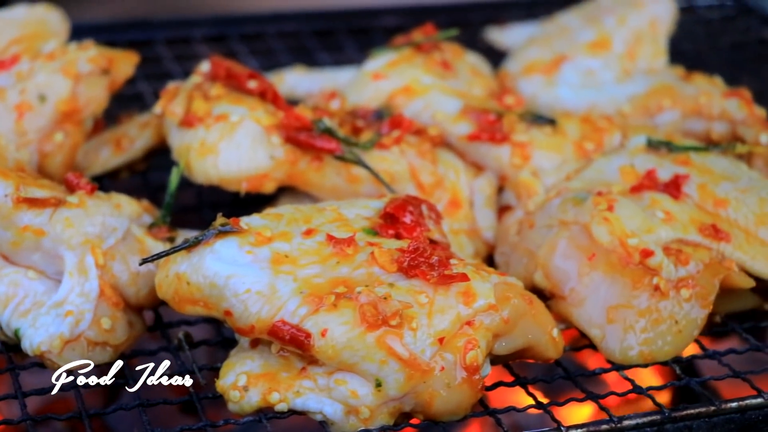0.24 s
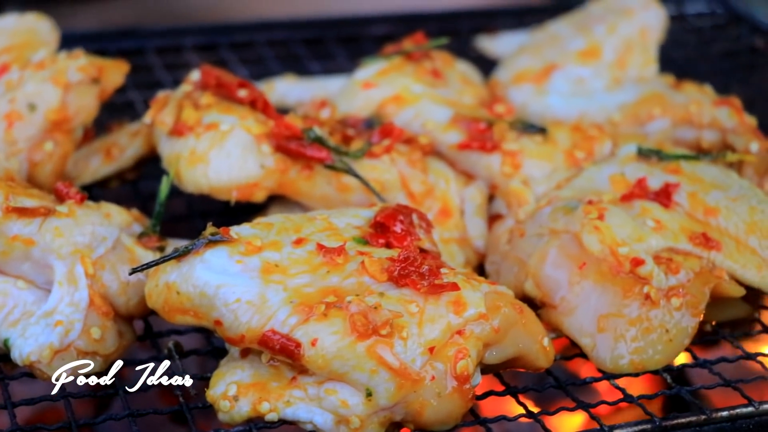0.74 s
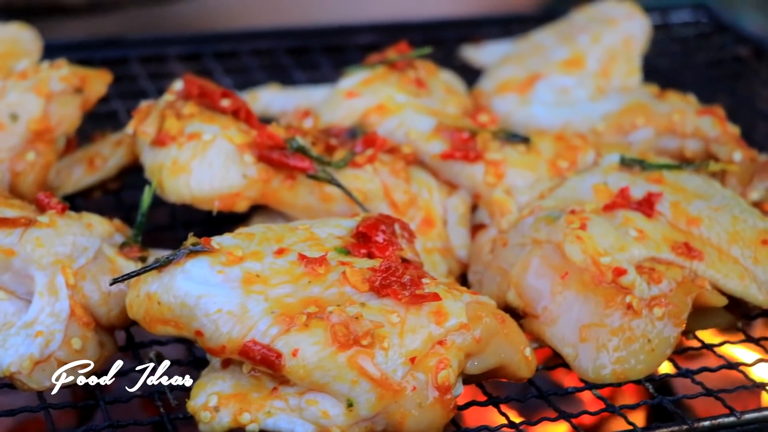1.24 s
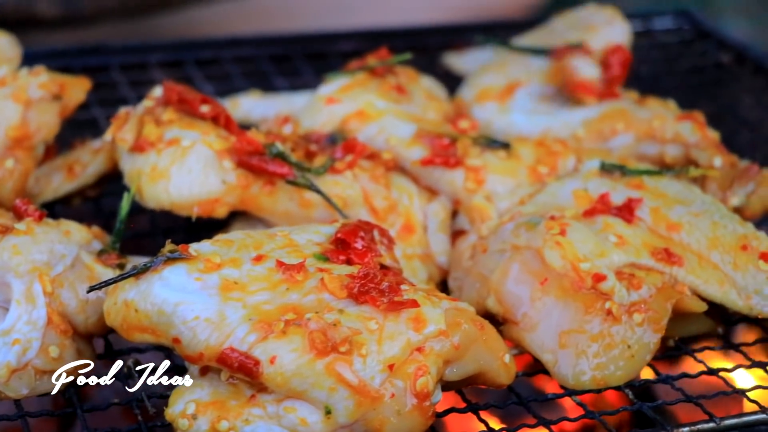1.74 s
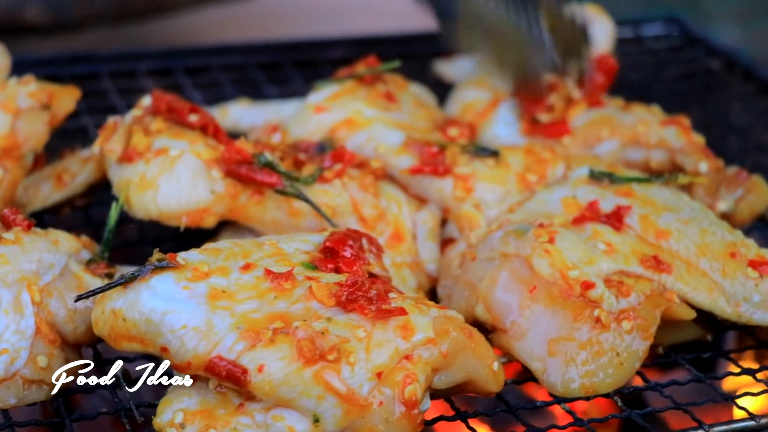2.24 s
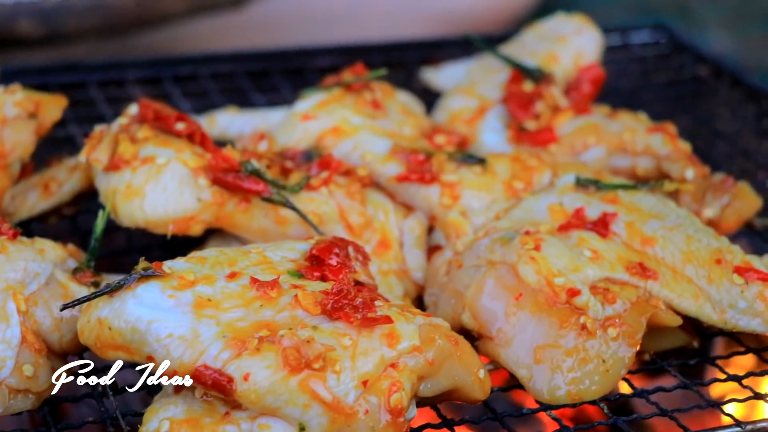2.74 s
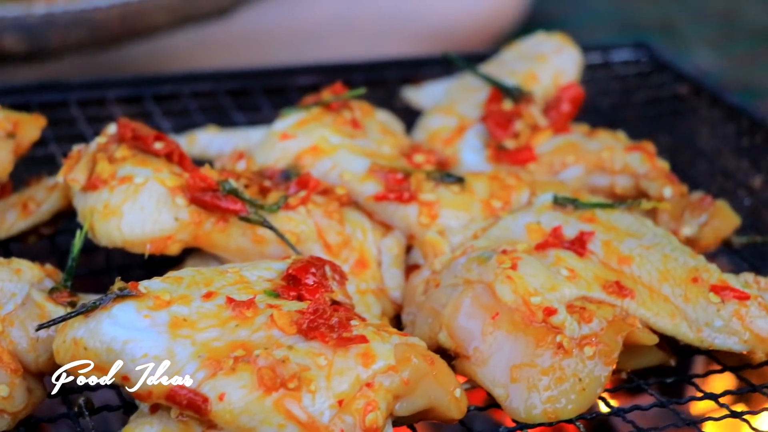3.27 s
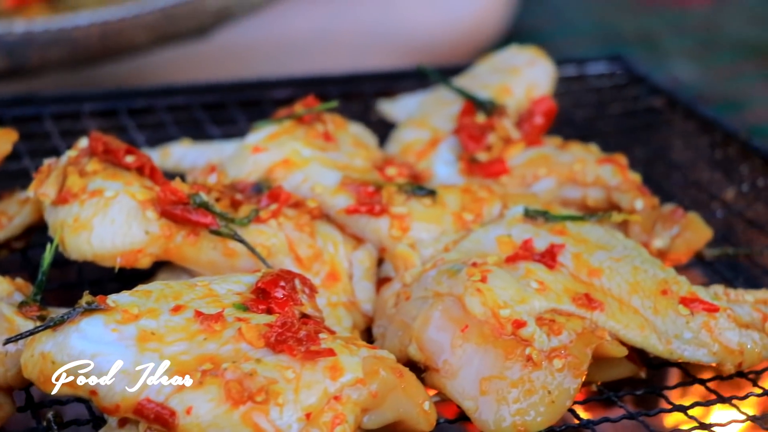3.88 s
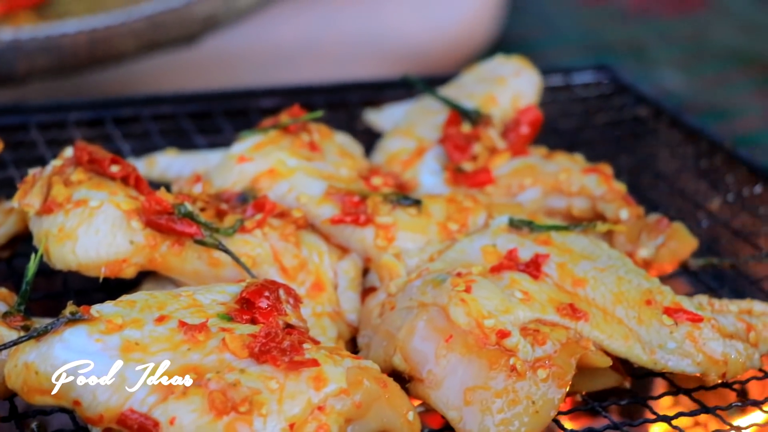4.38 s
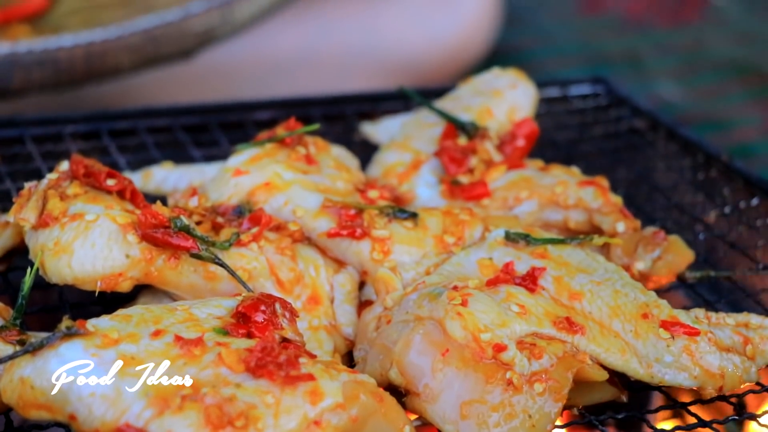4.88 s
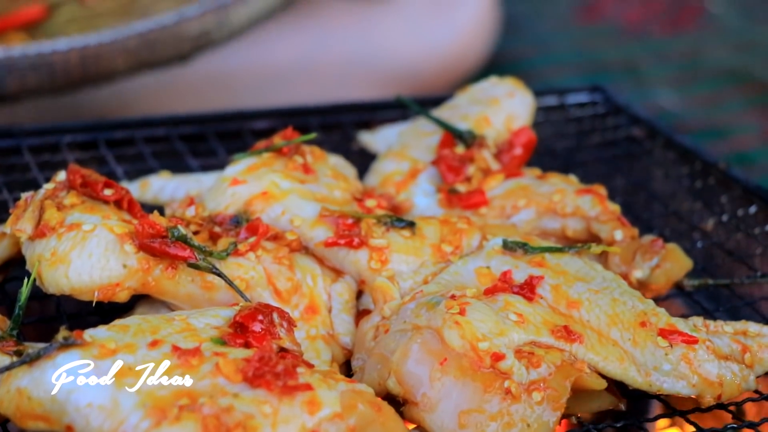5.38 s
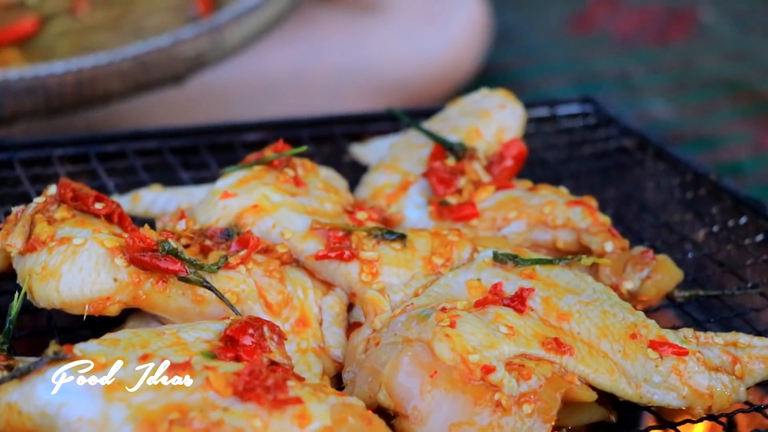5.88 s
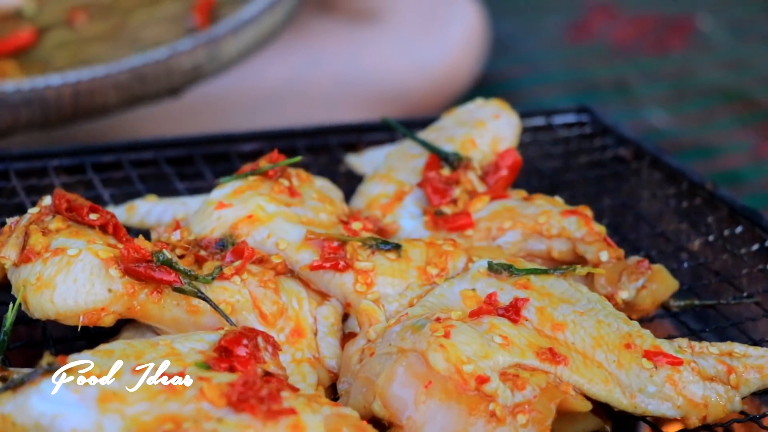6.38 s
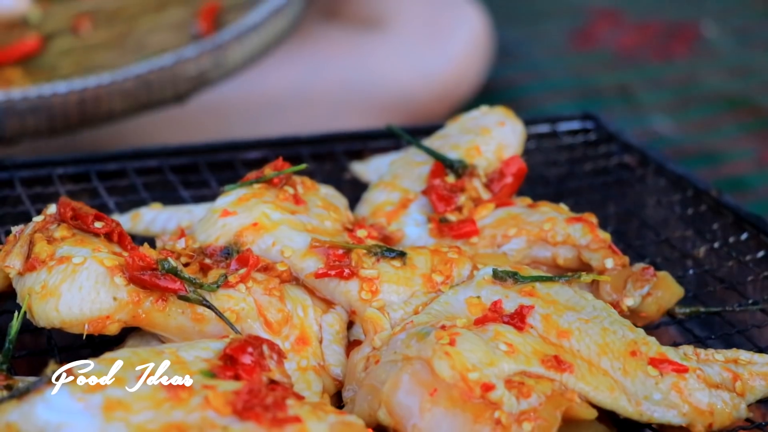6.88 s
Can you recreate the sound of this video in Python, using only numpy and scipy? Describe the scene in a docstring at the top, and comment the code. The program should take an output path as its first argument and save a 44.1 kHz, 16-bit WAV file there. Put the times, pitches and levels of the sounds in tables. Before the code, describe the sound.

Outdoors in a garden, meat sizzles steadily and softly over charcoal for the whole seven seconds, with fine spits, small ember crackles and a faint low rumble of far traffic. Close to the microphone, a steel spoon works in a hollow woven tray. From 0.1 to 1.1 s there are light, dull taps and short brushes, with faint thin whistles far off. A lull follows, with tiny ticks around 2.0 to 2.6 s, a slight scrape and more faint whistles at 2.4 and 3.0. At 3.2 s hard strokes begin: woody knocks, crunchy drags and sharp metallic clicks in bursts around 3.5, 4.0, 4.5, 4.8, 5.1 and 5.4. A soft low bump falls near 5.6, before another clatter. After a short pause, scraping resumes at 6.3, a weak whistle follows, and the brightest ringing clicks crowd 6.8 to 7.0. Dry, nearly mono, slightly louder on the right.

```python
"""Charcoal and sizzling meat in a garden, over far traffic, throughout: shaped noise, crackle and tiny rings.
Close by, a spoon works in a woven tray: a few light strokes in the first second, a lull with sparse ticks,
then busy hard strokes from 3.2 s on. Blows ring tray modes, slips drag over it, the steel edge ticks on ridges.
Thin far whistles, gliding sines, come from 0.4 s, again between 2.4 and 3.2 s, and late; a soft low bump
at 5.6 s is one damped sine. One microphone signal feeds both channels, the right a little louder."""
import sys
import numpy as np
from scipy import signal
from scipy.fft import rfft, irfft, next_fast_len
from scipy.io import wavfile
from scipy.ndimage import uniform_filter1d, map_coordinates

SR = 44100
rng = np.random.default_rng(int(sys.argv[2]) if len(sys.argv) > 2 else 0)


def gain_from_db(level_db):
    """Turn a decibel level (scalar or array-like) into a linear amplitude factor."""
    decades = np.asarray(level_db, float) / 20
    return 10 ** decades


def unload_wav(signal):
    """Save mono or channel-first audio to the path in sys.argv[1] as 16-bit WAV at rate SR, clipped to [-1, 1]."""
    wavfile.write(
        sys.argv[1],
        SR,
        np.round(np.clip(np.atleast_2d(signal).T, -1, 1) * 32767).astype(np.int16),
    )


N = 313992  # samples

# Levels in the event tables hold ahead of the gain of each channel.
# Far rumble spectrum: pitch_hz, level_db (per Hz)
RUMBLE = [(15, -43), (30, -13.5), (55, 0), (70, 2.5), (82, -5.5), (120, -5), (170, -11.5), (300, -61)]
# Spectrum of the embers: pitch_hz, level_db (per Hz)
EMBERS = [(110, -39), (200, -3.5), (330, -6), (430, -11.5), (710, -9.5), (2200, -21), (3000, -31)]
# Spectrum of the sizzling fat: pitch_hz, level_db (per Hz)
SIZZLE = [(1060, -20), (2000, -3), (3800, 0.5), (5800, -0.5), (6350, -8), (7200, -1.5), (9400, 0),
          (10300, 3.5), (11300, -6), (15200, -10), (16500, -55)]
# Blows on the tray: start_s, peak_db, main_ring_hz, brightness_db, t60_s
KNOCKS = [(0.063, -35.5, 340, -14, 0.024), (0.278, -27, 600, -4, 0.045), (0.2846, -29, 470, -9, 0.07),
          (0.291, -34, 950, -8, 0.04), (0.3368, -33.5, 560, -10, 0.035), (0.352, -32, 605, -16, 0.033),
          (0.366, -37, 980, -14, 0.046), (0.428, -42.5, 600, -5, 0.025), (0.6367, -36, 680, -21, 0.026),
          (0.665, -42, 450, -10, 0.035), (0.7103, -31, 766, -12, 0.035), (0.7205, -34, 270, -25, 0.06),
          (0.736, -35.5, 260, -20, 0.066), (0.815, -41, 620, -23, 0.045), (0.858, -42, 900, -20, 0.035),
          (0.8795, -32.5, 680, -23, 0.059), (0.959, -37.5, 400, -27, 0.034), (1.1402, -36, 513, -19, 0.042),
          (2.903, -28.5, 390, -5, 0.022), (3.2011, -16.5, 800, -7.5, 0.026), (3.247, -27, 400, -11, 0.05),
          (3.2841, -22, 440, -21, 0.055), (3.341, -27.5, 420, -1, 0.064), (3.4893, -34, 506, -2, 0.022),
          (3.513, -15, 570, -13, 0.03), (3.5185, -25, 400, -20, 0.035), (3.559, -35, 490, -20, 0.06),
          (3.5833, -19.5, 410, -22, 0.05), (3.594, -25, 380, -29, 0.07), (3.601, -26, 450, -20, 0.05),
          (3.6172, -17.5, 480, -13, 0.08), (3.632, -26, 490, -25, 0.1), (3.639, -21, 490, -14, 0.08),
          (3.859, -33, 400, -8, 0.03), (3.866, -27.5, 260, -24, 0.041), (3.938, -32, 350, -15, 0.04),
          (3.951, -31, 400, -10, 0.03), (3.9735, -20, 420, -16, 0.03), (3.979, -24, 580, -18, 0.045),
          (4.0085, -28, 490, -20, 0.07), (4.019, -26, 490, -20, 0.05), (4.0345, -19, 454, -18, 0.055),
          (4.0602, -24, 480, -10, 0.04), (4.0645, -22, 510, -16, 0.09), (4.1042, -25, 407, -6, 0.028),
          (4.4305, -14, 754, -10, 0.035), (4.451, -24, 900, -4, 0.037), (4.4628, -26.5, 510, -24, 0.035),
          (4.4842, -21, 1000, -1.5, 0.099), (4.515, -33, 700, -1, 0.033), (4.525, -27.5, 880, -4, 0.07),
          (4.7455, -12.5, 510, -2.5, 0.019), (4.7982, -19, 1110, -15, 0.033),
          (4.8172, -24, 700, -13, 0.058), (4.8487, -35, 415, -15, 0.07), (5.0442, -15.5, 590, -6, 0.03),
          (5.066, -21.5, 730, -9, 0.015), (5.0938, -25, 800, -4, 0.03), (5.1008, -13.5, 700, -14, 0.055),
          (5.153, -17, 620, -16, 0.045), (5.3013, -13.5, 504, -6, 0.026), (5.327, -26, 900, -4, 0.03),
          (5.3337, -21, 920, -5, 0.03), (5.338, -18, 950, -7, 0.03), (5.3447, -20, 670, -23, 0.05),
          (5.3652, -24, 460, -5, 0.083), (5.3922, -19.5, 590, -8, 0.043), (5.4107, -19.5, 455, -26, 0.067),
          (5.425, -19, 520, -25, 0.06), (5.4366, -22, 716, -15, 0.035), (5.4555, -25, 450, -12, 0.035),
          (5.6255, -17.5, 450, -9.5, 0.03), (5.6615, -18.5, 560, -14.5, 0.045),
          (5.67, -20, 950, -10, 0.035), (5.685, -19, 900, -10, 0.03), (5.6919, -16.5, 900, -10, 0.035),
          (5.7032, -17, 440, -16, 0.081), (6.2183, -38, 920, -11, 0.035), (6.2894, -30.5, 570, 0, 0.05),
          (6.3, -31, 500, -12, 0.04), (6.3045, -27, 700, -6, 0.05), (6.314, -28, 800, -8, 0.04),
          (6.3219, -15.5, 850, -5, 0.04), (6.35, -21.5, 500, -21, 0.055), (6.366, -25.5, 734, -19, 0.07),
          (6.377, -27, 900, -3, 0.03), (6.3844, -24, 750, -10, 0.039), (6.389, -21, 850, -6, 0.04),
          (6.399, -24, 600, -10, 0.04), (6.409, -29, 900, -5, 0.04), (6.4192, -29, 370, -20, 0.075),
          (6.4519, -24, 573, -15.5, 0.054), (6.4843, -38, 547, -30, 0.059), (6.6712, -31, 340, -6, 0.042),
          (6.7335, -30, 400, -20, 0.035), (6.783, -31, 900, -18, 0.03), (6.794, -28, 500, -3, 0.05),
          (6.8075, -33, 900, 0, 0.04), (6.8187, -24, 507, -15, 0.03), (6.8432, -26, 980, -11, 0.043),
          (6.855, -25, 1000, -6, 0.05), (6.863, -27, 980, 0, 0.04), (6.8752, -22, 950, -4.5, 0.04),
          (6.88, -19, 980, -6, 0.05), (6.9009, -21, 980, -16, 0.11), (6.9144, -19, 940, -17, 0.029),
          (6.9348, -24, 635, -2, 0.046), (6.9575, -28, 670, 7, 0.038)]
# Modes of the hollow tray: pitch_hz, level_db, t60_share (of the blow's or slip's t60)
TRAY = [(270, 0.5, 0.68), (311.8, -4.5, 1.6), (390, -4, 0.9), (490, 3.5, 1.2), (580, -5, 0.8),
        (670, 3, 0.96), (783, 6.5, 0.27), (980, 6, 0.57), (1192, -4.5, 1.1), (1576, 1, 0.27),
        (2220, -8.5, 0.43), (2580, -9.5, 0.18), (3400, -10.5, 0.12)]
# Snaps of the steel edge off a ridge: start_s, peak_db, main_ring_hz, top_db
TICKS = [(0.1133, -37, 7200, 1), (2.032, -32, 4530, -15), (2.041, -38, 4500, -4), (2.214, -38, 7400, -1),
         (2.6069, -34.5, 8130, 8), (3.312, -34, 8600, -6), (3.4903, -13.5, 7000, 10),
         (3.6394, -31.5, 5070, -19.5), (4.062, -37, 4500, -15), (4.091, -36, 3800, -15),
         (4.156, -38, 3700, -8), (4.205, -36.5, 4570, -15), (4.4837, -32, 4020, -19),
         (4.492, -30, 5170, -16), (4.7454, -30, 3770, -12), (4.7563, -30, 7100, 3), (4.7662, -32, 7140, 0),
         (4.781, -33, 7200, -3), (4.7887, -23.5, 6000, 10), (4.8023, -26, 6970, -10),
         (4.8107, -23, 8700, -3), (4.825, -26, 7340, 1), (4.9825, -31.5, 7960, 3), (5.0733, -32, 4710, 3),
         (5.1052, -26, 4010, -9), (5.14, -14, 4700, 0), (5.143, -17, 6500, 0), (5.1472, -24, 4520, -6),
         (5.3385, -19.5, 7350, -7), (5.3568, -18, 7210, -1), (5.363, -26, 5640, -12),
         (5.374, -19, 7000, -11), (5.3918, -23, 6850, 8), (5.4059, -14.5, 7000, -2),
         (5.426, -27, 7110, -11), (5.67, -26, 6960, -9), (5.6785, -24.5, 4240, -1), (5.985, -36, 8800, 1),
         (6.118, -37.5, 8800, 3), (6.3369, -19.5, 7000, -3), (6.3423, -24, 5600, -6),
         (6.3593, -23, 8620, -14), (6.3845, -30, 6730, -9), (6.4046, -31, 5700, -8),
         (6.4192, -28, 3970, -15), (6.4285, -15, 7150, -7), (6.793, -13, 8690, 3), (6.7963, -18, 5800, 0),
         (6.8178, -15.5, 5800, 1), (6.8437, -18, 5840, 2), (6.8576, -27, 5580, 5), (6.882, -26, 5540, -1),
         (6.9028, -9, 5700, 3), (6.9148, -13.5, 5700, 3), (6.9296, -24, 8740, -9), (6.937, -10, 6000, 0),
         (6.959, -10.5, 5670, -2), (6.975, -24.5, 5800, -6)]
# Modes of the spoon: pitch_hz, level_db, t60_s
SPOON = [(3700, -10.5, 0.003), (4570, -5.5, 0.0059), (5700, -9, 0.022), (6430, -15, 0.051),
         (6770, 1, 0.0028), (7350, -1.5, 0.0022), (8700, -3.5, 0.0036), (10000, -2, 0.0026),
         (12240, -2, 0.0014), (14750, -13, 0.0014)]
# Sliding strokes: start_s, hardest_s, end_s, pressure_db, edge_over_tray_db
STROKES = [(0.338, 0.362, 0.37, -51, -12), (0.63, 0.72, 0.75, -58, -14), (0.8, 0.83, 0.9, -52.5, -12),
           (2.41, 2.442, 2.52, -50, -13), (3.235, 3.327, 3.39, -38.5, -17), (3.545, 3.602, 3.66, -44, -14),
           (3.93, 3.953, 4, -41, -10.5), (4, 4.034, 4.17, -50, -17), (4.431, 4.448, 4.54, -33, -15.5),
           (4.667, 4.675, 4.74, -57.5, 2), (4.76, 4.796, 4.87, -37, -8), (5.057, 5.128, 5.195, -35, -10),
           (5.312, 5.37, 5.49, -29.5, -15), (5.635, 5.677, 5.75, -31, -18), (5.953, 5.97, 5.9, -58, 1.5),
           (6.215, 6.232, 6.3, -56.5, 0), (6.265, 6.402, 6.5, -38, -9), (6.665, 6.683, 6.8, -50.5, 1),
           (6.783, 6.89, 6.98, -36, -5)]
# How slips wake the tray modes: pitch_hz, level_db
DRAG = [(270, -1), (390, 0), (480, -3), (680, -3), (980, -8), (1300, -9), (2000, -25)]
# Spectrum of the weave crunching: pitch_hz, level_db (per Hz)
CRUNCH = [(500, -50), (800, -26), (1300, -3), (2200, -3), (3500, -5), (5500, -11), (9000, -25),
          (12000, -60)]
# Spectrum of the edge rasping: pitch_hz, level_db (per Hz)
RASP = [(2500, -8.5), (3500, -4.5), (5200, 4), (5550, 4), (5710, 9.5), (5900, 3), (6200, -2), (6900, 2),
        (9900, -4), (13000, -14), (16000, -40)]
# Far whistles: start_s, end_s, first_hz, last_hz, level_db
WHISTLES = [(0.42, 0.48, 2880, 2800, -64), (0.495, 0.58, 2960, 2920, -64), (0.595, 0.64, 2750, 2900, -64),
            (0.66, 0.76, 2900, 2850, -64), (1.39, 1.54, 4200, 4280, -63), (1.354, 1.45, 3800, 3740, -66),
            (2.41, 2.45, 3740, 3720, -59), (2.443, 2.492, 2960, 2880, -57.5),
            (2.99, 3.195, 4240, 4370, -61), (6.46, 6.693, 2490, 2490, -60.5), (7.008, 7.2, 4250, 4250, -60)]
# Soft low bump: start_s, pitch_hz, level_db (where its decay starts), t60_s
THUMP = (5.57, 68, -27, .2)

RUMBLE_DB, RUMBLE_DB_PER_S = -50.5, 0.31  # at the start; it creeps up
EMBER_DB, SIZZLE_DB, SPIT_DB = -55.5, -54.5, -38.0
REST_S, THUD_HZ, THUD_DB = 0.035, 400, -3.5  # a blow this long after the last wakes modes under this pitch
NEAR_DB, NEAR_DB_PER_S = 6.5, 2600  # loss per octave from the struck pitch; more per second of a long t60
CRACK_S, CRACK_S_PER_DB = 0.011, 0.0003  # t60 of a crack at 0 dB; weaker ones drag on a little longer
START_DB, LIFT_DB, SHOULDER = -9.5, -24.5, 2.16  # touch-down, lift-off under the hardest; roundness of swell
EDGE_SWING = 0.76  # the edge follows the pressure less than the tray
CRUNCH_DB, CRUNCH_EDGE = -1.5, 0.52  # weave under the tray, and its share of the edge's gain in dB
SHAKE_DB, SHAKE_CRUNCH_DB, SHAKE_S = -20, -12, 0.1  # under the blow's peak, crunch under that, t60
CHATTER_DB, CHATTER_S = -25, 0.054  # under the tick's peak, t60
SLIPS_PER_S, SLIP_T60_S, SPOTS = 520, 0.036, 16  # each spot on the weave rings the tray its own way
RIGHTWARD_DB = 1.4  # right up, left down


def unit(x):
    """Scale to rms 1."""
    return x / np.sqrt(np.mean(x ** 2) + 1e-20)


def coloured(x, spectrum):
    """x filtered through (Hz, dB) points on a log axis, rms 1."""
    m = next_fast_len(N + 8192)
    hz, db = np.transpose(spectrum)
    gain = gain_from_db(np.interp(np.log(np.fft.rfftfreq(m, 1 / SR) + 1), np.log(hz + 1), db))
    return unit(irfft(rfft(x, m) * gain, m)[:N])


def wobble(rate):
    """A smooth random curve, rate knots a second."""
    knots = rng.standard_normal(int(N * rate / SR) + 4)
    return map_coordinates(knots, [np.arange(N) * rate / SR])


def patchy(depth_db):
    """White noise with patches of random gain in time and frequency."""
    z = signal.stft(rng.standard_normal(N), nperseg=512)[2]
    field = uniform_filter1d(rng.standard_normal(z.shape), size=5, axis=0)
    field = uniform_filter1d(field, size=10, axis=1)
    return signal.istft(z * gain_from_db(depth_db * unit(field)), nperseg=512)[1][:N]


def grains(rate, spread_db, life):
    """Noise bursts at random moments, rate a second, of random sizes; life is their t60 in seconds."""
    hit = rng.random(N) < rate / SR
    size = hit * gain_from_db(spread_db * np.minimum(rng.exponential(size=N), 4))
    fade = gain_from_db(-60 * np.arange(SR // 20) / SR / life)
    return signal.fftconvolve(size, fade)[:N] * rng.standard_normal(N)


def blips(count, low_hz, octaves, cycles, spread_db):
    """Tiny short rings of random moment, pitch and size; each falls 60 dB in so many cycles."""
    when, pitch, size = rng.random((count, 3)).T
    t = np.arange(500) / SR
    hz = low_hz * 2 ** (octaves * pitch[:, None])
    blip = np.sin(2 * np.pi * hz * t) * gain_from_db(-spread_db * size[:, None] - 60 * t * hz / cycles)
    at = (when * N).astype(int)[:, None] + np.arange(len(t))
    return np.bincount(at.ravel(), blip.ravel(), N + len(t))[:N]


def ring(t, hz, db, t60):
    """Damped modes struck at t = 0; neighbours move in opposite senses, so little sounds outside their range."""
    sense = (-1) ** np.arange(len(hz))[:, None]
    decay = gain_from_db(db[:, None] - 60 * t / t60[:, None])
    return np.sum(sense * decay * np.sin(2 * np.pi * hz[:, None] * t), axis=0)


def add(track, s, sound, peak_db):
    """Lay a sound on the track at its peak level."""
    track[round(s * SR):][:len(sound)] += gain_from_db(peak_db) * sound / np.abs(sound).max()


def grill():
    """Fat hisses evenly and spits, embers draw air, far traffic rumbles: shaped noise, grains and blips."""
    rumble_gain = gain_from_db(RUMBLE_DB + RUMBLE_DB_PER_S * np.arange(N) / SR)
    rumble = rumble_gain * coloured(patchy(depth_db=1.5), RUMBLE)
    crackle = unit(grains(rate=8.3, spread_db=-2.5, life=0.023))
    embers = coloured(patchy(depth_db=1.6) + 0.25 * crackle, EMBERS)
    sputter = unit(grains(rate=30, spread_db=4, life=0.015))
    sizzle = coloured(patchy(depth_db=0.3) + 0.2 * sputter, SIZZLE)
    spits = blips(count=260, low_hz=2480, octaves=2, cycles=16, spread_db=12.5)
    return rumble + gain_from_db(EMBER_DB) * embers + gain_from_db(SIZZLE_DB) * sizzle + gain_from_db(SPIT_DB) * spits


def knocks():
    """Blows ring tray modes near the main pitch, more selectively if long; hard contact wakes upper ones."""
    out, t = np.zeros(N + SR), np.arange(SR // 5) / SR
    hz, db, share = np.transpose(TRAY)
    chance = rng.standard_normal((len(KNOCKS), 2, len(TRAY)))
    # loose strips rattle faintly after the blow itself
    rattle = 0.05 * rng.standard_normal((len(KNOCKS), 600)) * gain_from_db(-60 * t[:600] / 0.03)
    rattle[:, 0] = 1
    at_rest = np.diff([row[0] for row in KNOCKS], prepend=0) > REST_S
    for row, (loud, tune), contact, rested in zip(KNOCKS, chance, rattle, at_rest):
        s, peak_db, main_hz, bright_db, t60 = row
        near_db = -250 * t60 * np.abs(np.log2(hz / main_hz))
        favoured = np.where(hz < 1300, near_db, bright_db + 4)
        favoured = np.where(rested & (hz < THUD_HZ), np.maximum(favoured, THUD_DB), favoured)
        sound = ring(t, hz * (1 + 0.022 * tune), db + favoured + 2.5 * loud, share * t60)
        sound *= (1 - np.exp(-t / 0.00008)) ** 2  # the contact takes a moment to build
        add(out, s, np.convolve(sound, contact)[:len(t)], peak_db)
    return out[:N]


def ticks():
    """The steel edge snaps off a ridge: a short noisy crack that sets the spoon ringing."""
    out, t = np.zeros(N + SR), np.arange(SR // 25) / SR
    hz, db, spoon_t60 = np.transpose(SPOON)
    chance = rng.standard_normal((len(TICKS), len(SPOON)))
    noise = rng.standard_normal((len(TICKS), len(t)))
    noise[:, 0] = 6.5  # the snap itself leads the crack
    # long-ringing modes need a closer match
    loss_per_octave = NEAR_DB + NEAR_DB_PER_S * spoon_t60 * (spoon_t60 > 0.01)
    for (s, peak_db, main_hz, top_db), loud, crack in zip(TICKS, chance, noise):
        near_db = -loss_per_octave * np.abs(np.log2(hz / main_hz))
        favoured = np.where(hz < 9000, near_db, top_db - 2.5)
        tuned_hz = hz * (1 + 0.01 * loud[::-1])
        sound = ring(t, tuned_hz, db + favoured + 2.5 * loud, spoon_t60)
        sound *= 1 - np.exp(-t / 0.00008)
        crack_fade = gain_from_db(-60 * t / (CRACK_S - CRACK_S_PER_DB * peak_db))
        add(out, s, np.convolve(sound, crack * crack_fade)[:len(t)], peak_db)
    return out[:N]


def contact_levels():
    """Gains of tray, weave and edge: pressure swells once a stroke, blows shake, ticks leave chatter."""
    t, level = np.arange(N) / SR, np.zeros((3, N))
    for start, hardest, end, db, edge_db in STROKES:
        on = slice(round(start * SR), round(end * SR))  # empty, so silent, where end is before start
        before = t[on] < hardest
        away = np.where(before, (hardest - t[on]) / (hardest - start), (t[on] - hardest) / (end - hardest))
        ease_db = np.where(before, START_DB, LIFT_DB) * np.abs(away) ** SHOULDER
        part_db = np.array([[0], [CRUNCH_DB + CRUNCH_EDGE * edge_db], [edge_db]])
        level[:, on] += gain_from_db(db + ease_db * [[1], [1], [EDGE_SWING]] + part_db)
    for s, peak_db, *_ in KNOCKS:
        shake_db = peak_db + SHAKE_DB - 60 * t[:SR // 8] / SHAKE_S
        level[:2, round(s * SR):][:, :len(shake_db)] += gain_from_db(shake_db + [[0], [SHAKE_CRUNCH_DB]])
    for s, peak_db, *_ in TICKS:
        chatter_db = peak_db + CHATTER_DB - 60 * t[:SR // 20] / CHATTER_S
        level[2, round(s * SR):][:SR // 20] += gain_from_db(chatter_db)
    return level


def drags():
    """Sliding contact: small separate slips ring the tray, crunch in the weave and rasp at the edge."""
    tray_level, weave_level, edge_level = contact_levels()
    t = np.arange(SR // 8) / SR
    hz, db, share = np.transpose(TRAY)
    slip_size = rng.standard_normal(N) * gain_from_db(2.2 * rng.standard_normal(N))
    slips = unit((rng.random(N) < SLIPS_PER_S / SR) * slip_size)
    drag_hz, drag_db = np.transpose(DRAG)
    woken_db = db + np.interp(np.log(hz), np.log(drag_hz), drag_db)
    spot = rng.integers(SPOTS, size=N)
    boom = np.zeros(N)
    for k, (loud, tune) in enumerate(rng.standard_normal((SPOTS, 2, len(TRAY)))):
        body = ring(t, hz * (1 + 0.05 * tune), woken_db + 4 * loud, share * SLIP_T60_S)
        spot_slips = tray_level * slips * (spot == k)
        boom += signal.fftconvolve(spot_slips, body / np.linalg.norm(body))[:N]
    snaps = blips(count=4500, low_hz=1100, octaves=2.2, cycles=10, spread_db=24)
    crumbling = grains(rate=600, spread_db=3.8, life=0.016)
    crunch = coloured(0.6 * unit(snaps) + unit(crumbling), CRUNCH)
    rasp = coloured(grains(rate=800, spread_db=3.5, life=0.014), RASP)
    return boom + weave_level * crunch + edge_level * rasp


def whistles():
    """Thin gliding sines, unsteady in pitch and level, that swell and fade."""
    t, out = np.arange(N) / SR, np.zeros(N)
    for start, end, first_hz, last_hz, db in WHISTLES:
        hz = np.interp(t, [start, end], [first_hz, last_hz])
        swell = np.clip(np.minimum(t - start, end - t) / 0.012, 0, 1)
        phase = 2 * np.pi * np.cumsum(hz * (1 + 0.017 * wobble(450))) / SR
        out += gain_from_db(db + 2.5 * wobble(80)) * swell * np.sin(phase)
    return out


def thump():
    """One low push, a damped sine with a soft start."""
    s, hz, db, t60 = THUMP
    t = np.clip(np.arange(N) / SR - s, 0, None)
    return gain_from_db(db - 60 * t / t60) * (1 - np.exp(-t / 0.0039)) * np.sin(2 * np.pi * hz * t)


def scene():
    """One microphone signal holds all; the right channel is the louder."""
    mono = grill() + knocks() + ticks() + drags() + whistles() + thump()
    return mono * gain_from_db([[-RIGHTWARD_DB], [RIGHTWARD_DB]])


def roll_off(x):
    """The treble ends steeply here."""
    return signal.sosfilt(signal.butter(12, 16100, fs=SR, output="sos"), x)


def record(dry):
    """The finished mix goes to file form with no further change of place or level."""
    return roll_off(dry)


dry = scene()
out = record(dry)
unload_wav(out)
```